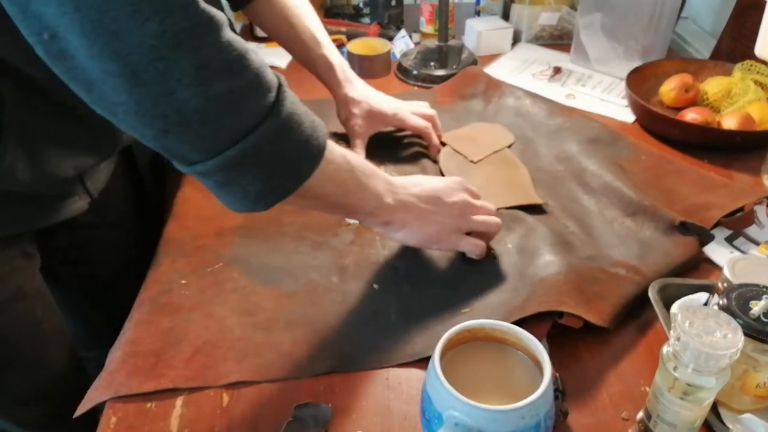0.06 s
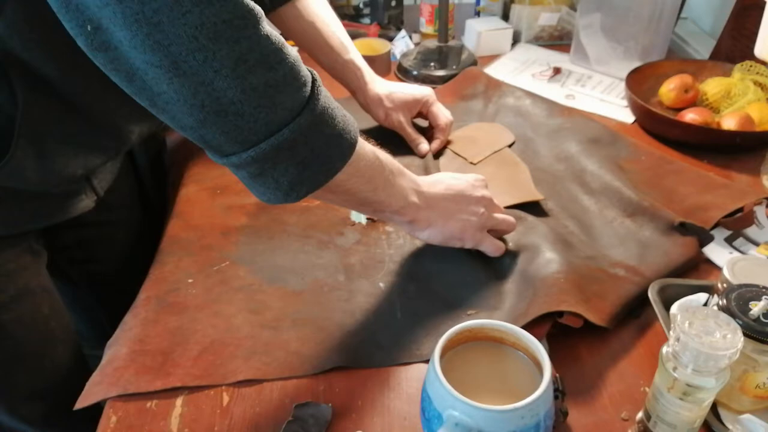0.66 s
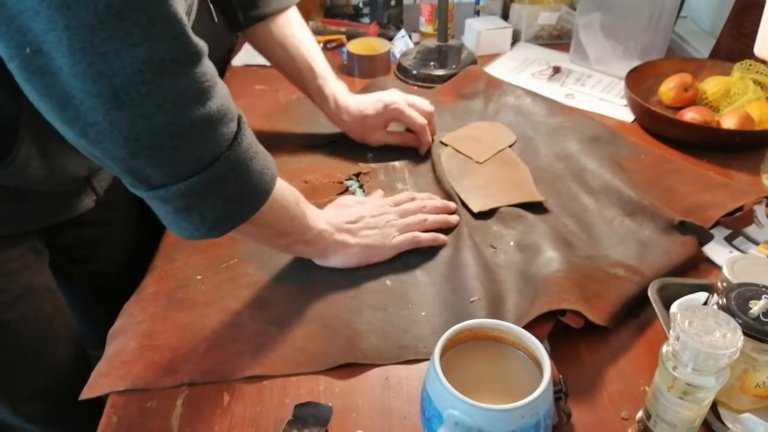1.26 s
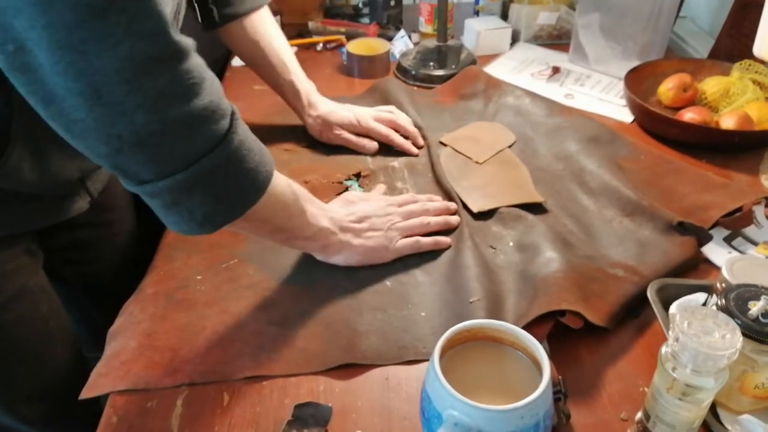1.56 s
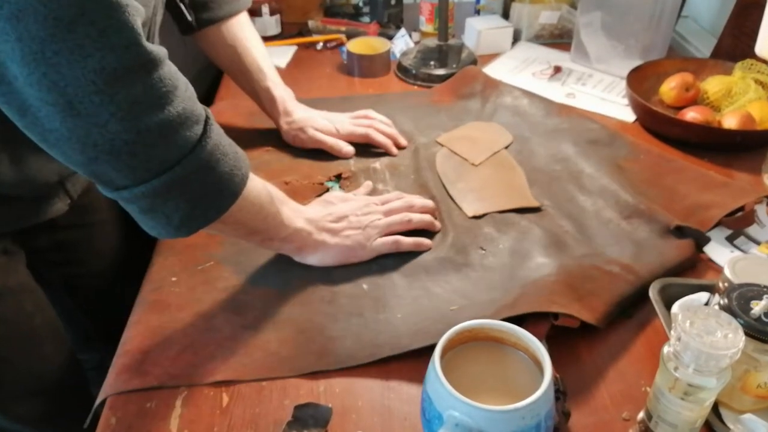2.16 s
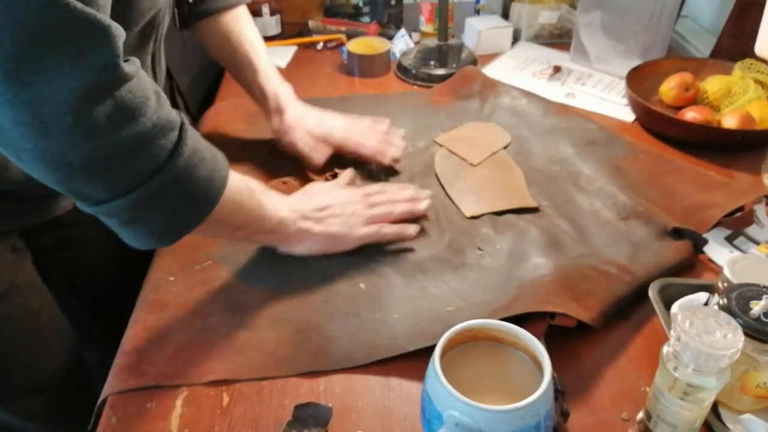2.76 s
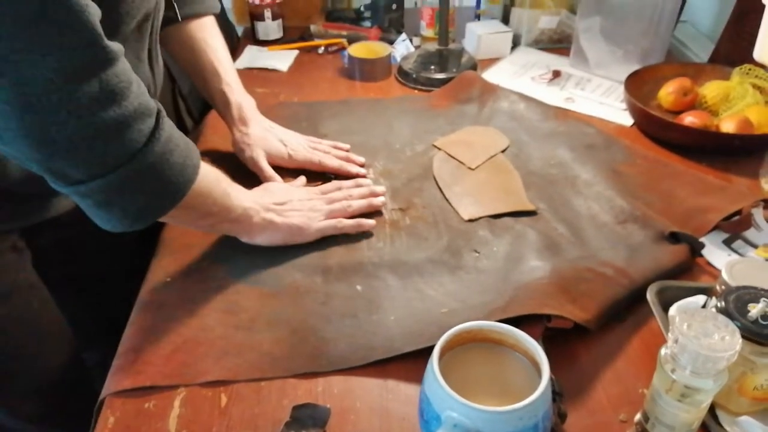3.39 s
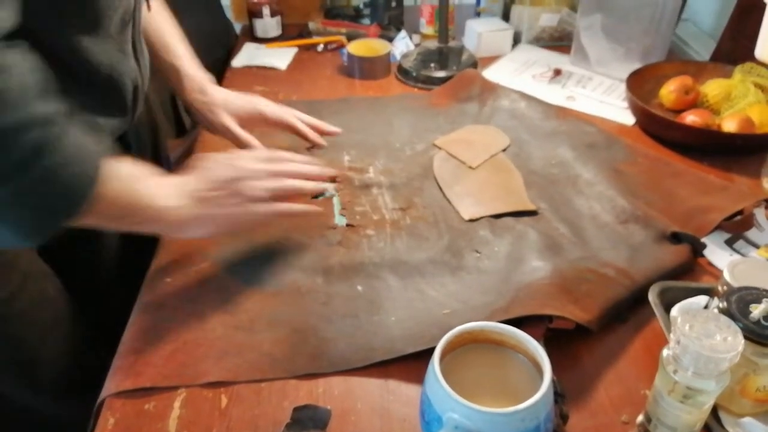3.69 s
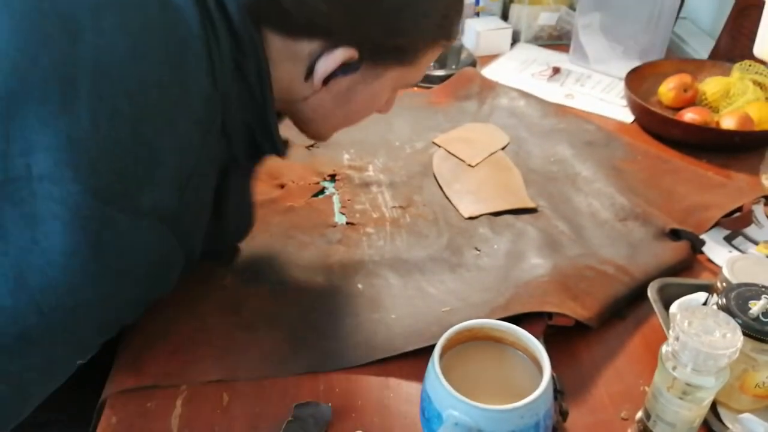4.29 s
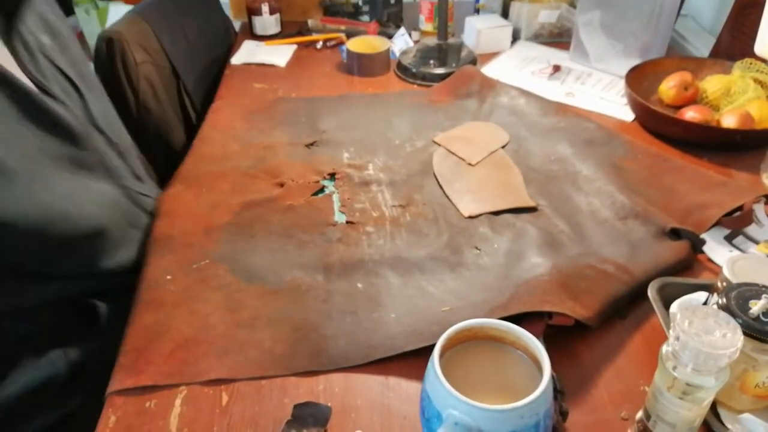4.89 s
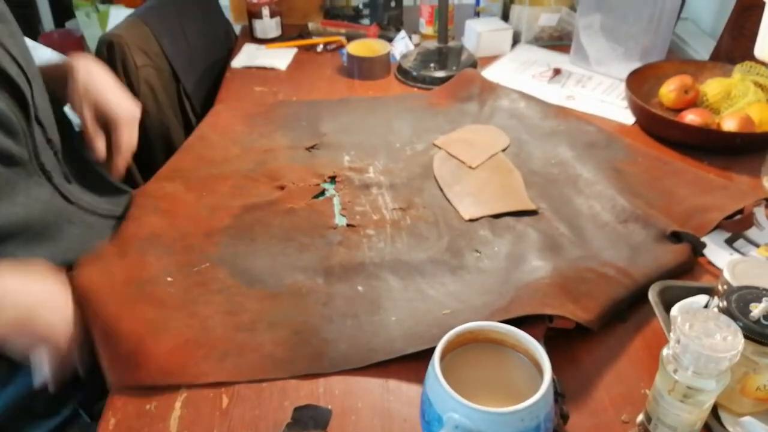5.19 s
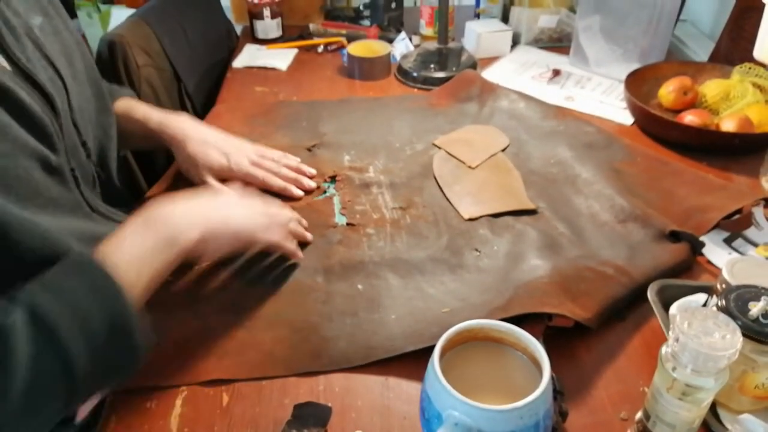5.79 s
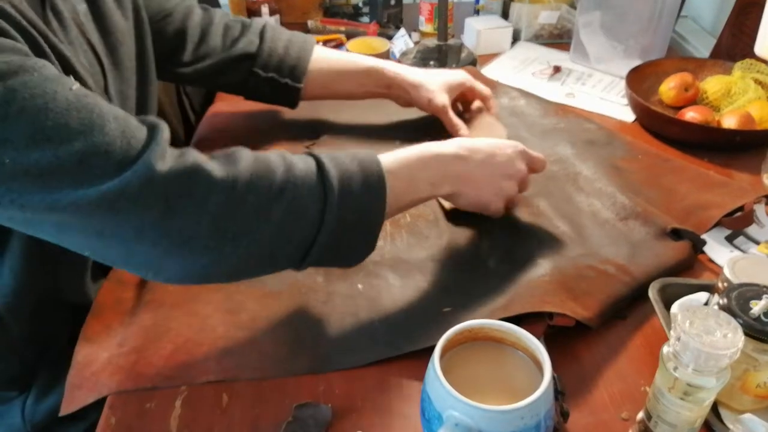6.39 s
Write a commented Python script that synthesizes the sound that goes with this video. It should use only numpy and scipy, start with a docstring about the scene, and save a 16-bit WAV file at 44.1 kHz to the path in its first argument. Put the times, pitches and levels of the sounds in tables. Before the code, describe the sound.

Hands pat and smooth a leather hide on a wooden table, with dull thumps, rustling slides and a flopping slap.

```python
"""Working leather on a table

A large hide is worked flat on a wooden table in a small, faintly humming room. Palms pat and smooth
it, a sleeve swishes, the hide is dragged along and its edge flops down with a slap. Each blow rocks
the table and sets its top booming, while the leather smacks, creaks once and pops hollowly. Sliding
is made of many tiny slips, heard as a rustle, a scrape and a grainy hiss."""
import sys
import numpy as np
from scipy import signal
from scipy.fft import rfft, irfft
from scipy.io import wavfile

SR = 44100
rng = np.random.default_rng(int(sys.argv[2]) if len(sys.argv) > 2 else 0)


def pcm_store(signal):
    """Save signal as 16-bit PCM."""
    levels = np.round(np.clip(np.atleast_2d(signal), -1, 1) * 32767)
    wavfile.write(sys.argv[1], SR, levels.astype(np.int16).T)


N = 284445
TIME = np.arange(N) / SR
BIN_HZ = np.maximum(np.arange(N // 2 + 1) * SR / N, 1)


def from_db(db):
    """Turn decibels into a gain, a number to multiply a sound by."""
    return 10 ** (np.asarray(db) / 20)


def rms_one(x):
    """Scale a sound so that its average power is 1."""
    return x / np.sqrt(np.mean(x ** 2) + 1e-20)


def at_hz(points, hz):
    """Read a table between its rows, giving each octave equal room."""
    row_hz, value = np.transpose(points)
    return np.interp(np.log(hz), np.log(row_hz), value)


def add(track, s, sound):
    """Mix a short sound into a track, starting at s seconds."""
    start = max(round(s * SR), 0)
    track[start:start + len(sound)] += sound[:N - start]


def gain_curves(rows):
    """Turn each dB column of a table into a gain over time."""
    s, *columns = np.transpose(rows)
    return [from_db(np.interp(TIME, s, column)) for column in columns]


def envelope(s, attack, hold, release):
    """A gain that rises, holds and falls."""
    return np.interp(TIME, s + np.cumsum([0, attack, hold, release]), [0, 1, 1, 0])


def swells(rows):
    """A gain made of smooth, bell-shaped bumps."""
    return sum(from_db(db) * np.exp(-.5 * ((TIME - s) / width) ** 2) for s, db, width in rows)


def unsteady(per_s, depth_db):
    """A gain that wanders at random."""
    return from_db(depth_db * np.interp(TIME * per_s, np.arange(N), rng.standard_normal(N)))


def narrow_noise(hz, width):
    """A blurred tone: noise kept close to one pitch."""
    return rms_one(irfft(rfft(rng.standard_normal(N)) / (1 + (2 * (BIN_HZ - hz) / width) ** 2), N))


def grains(per_s, spread_db):
    """Two unrelated streams of tiny slips of uneven size."""
    sizes = from_db(spread_db * np.minimum(rng.exponential(1, N), 4))
    return rng.standard_normal((2, N)) * sizes * (rng.random(N) < per_s / SR)


def press(width_ms):
    """The force of a soft touch: half a sine wave that adds up to 1."""
    pulse = np.sin(np.pi * np.clip(TIME[:SR // 3] * 1000 / width_ms, 0, 1))
    return pulse / pulse.sum()


def ring(force, modes):
    """A changing force starts an object's own tones (modes); neighbours swing opposite ways."""
    out = np.zeros(len(force))
    for k, (hz, db, fade_s) in enumerate(modes):
        decay = from_db(-60 / (fade_s * SR))
        feedback = [1, -2 * decay * np.cos(2 * np.pi * hz / SR), decay * decay]
        out += (-1) ** k * from_db(db) * signal.lfilter([.5, 0, -.5], feedback, force + 1e-18)
    return out


def resonance(x, hz, width):
    """The part of a sound that lies near one pitch."""
    return signal.lfilter(*signal.iirpeak(hz, hz / width, fs=SR), x)


# Each row: frequency in Hz, how alike the two ears are (1 the same, 0 unrelated, -1 opposite).
EAR_LIKENESS = [(60, 0.8), (140, 0.86), (270, 0.86), (520, 0.53), (1250, 0), (1650, -0.3), (2100, 0.17),
                (5000, -0.11), (15000, 0)]
# Each row: frequency in Hz, how much louder the left ear is in dB.
EAR_BALANCE = [(130, 0), (270, -3.5), (550, -4.5), (1000, -2.5), (3000, -2), (5000, -0.5), (6400, 2.5),
               (8100, -6), (10500, -2), (14500, 2)]
def colour(streams, spectrum):
    """Give two noise streams a tone colour and spread them over the ears, at power 1."""
    octaves_outside = np.abs(np.log2(BIN_HZ / np.clip(BIN_HZ, spectrum[0][0], spectrum[-1][0])))
    mid, side = rfft(streams) * from_db(at_hz(spectrum, BIN_HZ) - 30 * octaves_outside)
    alike = np.clip(at_hz(EAR_LIKENESS, BIN_HZ), -1, 1)
    ears = np.array([[1], [-1]])
    pair = np.sqrt(1 + alike) * mid + np.sqrt(1 - alike) * side * ears
    balance = from_db(ears * at_hz(EAR_BALANCE, BIN_HZ) / 2)
    return rms_one(irfft(pair * balance, N))


# The quiet room's noise. Each row: frequency in Hz, relative level in dB.
AIR_COLOUR = [(30, 0.5), (90, -8), (160, -10.5), (250, -13.5), (520, -18), (800, -18.5), (1500, -21),
              (2900, -25), (4000, -32), (5300, -24), (7300, -20), (9500, -34), (13000, -32.5),
              (15500, -30.5)]
# The room's hum. Each row: pitch in Hz, width in Hz, level in dB.
HUM_TONES = [(99, 5.9, -78.5), (145.9, 5.5, -74.5), (520, 28, -81)]
# Brief swells at the highest hum pitch. Each row: peak time in seconds, level in dB, width in seconds.
HUM_SWELLS = [(0.97, -74, 0.018), (2.14, -69.5, 0.039)]
# A deep drone. Each row: time in seconds, level in dB.
DRONE_LEVELS = [(0, -71.5), (1.8, -72.5), (1.92, -87.5), (6.45, -91.5)]
def room_air():
    """Faint hiss, a few wavering hum tones and a deep drone that dies away."""
    hum = sum(from_db(db) * narrow_noise(hz, width) * unsteady(per_s=2, depth_db=1.5)
              for hz, width, db in HUM_TONES)
    hum += swells(HUM_SWELLS) * narrow_noise(*HUM_TONES[-1][:2])
    drone = gain_curves(DRONE_LEVELS)[0] * narrow_noise(hz=41, width=7)
    hiss = from_db(-67) * colour(rng.standard_normal((2, N)), AIR_COLOUR)
    return hum + drone + hiss


# Flat palms land on the hide. Each row: start in seconds, relative levels of sway, boom and smack
# in dB, time taken to land in milliseconds.
PALM_PATS = [(0.001, -54, -35.5, -45.5, 0.56), (0.015, -65, -50, -50, 5.5), (1.286, -50, -61, -61, 7.4),
             (2.521, -54, -37.5, -51, 1.4), (2.554, -53, -34, -48, 4), (2.852, -38.5, -33.5, -40, 6.2),
             (3.135, -41, -51, -43, 2.7), (3.145, -33.5, -29.5, -38, 3.6), (3.468, -42, -29.5, -51.5, 1.6),
             (5.446, -69, -53.5, -54.5, 2.5), (5.614, -38, -31.5, -35, 3.3), (5.645, -36, -43, -28.5, 4.4)]
# Fingers and sagging leather bump. Each row: start in seconds, relative boom and smack levels in dB.
SOFT_BUMPS = [(0.038, -40, -49), (0.379, -56, -69), (1.177, -36, -57), (1.206, -47.5, -64),
              (3.874, -60.5, -68), (4.528, -43.5, -46.5), (4.992, -43, -58), (5.031, -45.5, -63),
              (5.189, -48, -56.5), (5.415, -58, -67), (6.184, -46, -53.5), (6.238, -37, -51),
              (6.329, -40.5, -57)]
# Folds flop over. Each row: start in seconds, relative boom and crack levels in dB, time taken to
# land in milliseconds.
FOLD_FLOPS = [(4.621, -54, -41.5, 7), (4.806, -26, -27, 3.6), (4.814, -27.5, -28, 8.9),
              (4.932, -38, -47.5, 5)]
def blows():
    """All blows as columns: start, five levels, landing time. Palms slap, bumps thud, folds snap."""
    # The five relative levels, in dB: sway, boom, smack, slap, snap.
    pats = [(s, sway, boom, smack, smack - 6.5, smack - 9.5, landing_ms)
            for s, sway, boom, smack, landing_ms in PALM_PATS]
    bumps = [(s, boom - 18, boom, smack, smack - 14.5, smack - 16.5, 4)
             for s, boom, smack in SOFT_BUMPS]
    flops = [(s, crack - 11.5, boom, crack - 4.5, crack - 5, crack + 3.5, landing_ms)
             for s, boom, crack, landing_ms in FOLD_FLOPS]
    return np.transpose(pats + bumps + flops)


def pushes(starts, levels_db, width_ms):
    """Hand and leather press on the table once at each blow."""
    force = np.zeros(N)
    for s, db in zip(starts, levels_db):
        add(force, s, from_db(db) * press(width_ms))
    return force


# The tones of the table swaying on its legs, then of its top.
# Each row: pitch in Hz, relative level in dB, seconds to fade by 60 dB.
SWAY_MODES = [(41.4, -0.5, 0.35), (61, 1.5, 0.35)]
TOP_MODES = [(89.4, -10.5, 0.32), (124.7, 0.5, .21), (138, -7.5, 0.11), (161.6, -6.5, 0.32),
             (248.3, -18.5, 0.29), (284, -18.5, 0.4), (382.6, -12.5, 0.28)]
def table_boom():
    """Blows rock the table on its legs and make the top boom."""
    starts, sway_db, boom_db, *_ = blows()
    sway = ring(pushes(starts, sway_db, width_ms=14.4), SWAY_MODES)
    boom = ring(pushes(starts, boom_db, width_ms=2.63), TOP_MODES)
    return from_db(3) * sway + from_db(2.5) * boom


def landings(levels_db, linger_s):
    """A gain that grows as more leather touches, then dies away with the squeezed air and creases."""
    starts, *_, landing_ms = blows()
    power, age = np.zeros(N), TIME[:SR // 4]
    for s, db, rise_s in zip(starts, levels_db, landing_ms / 1000):
        rise = np.minimum(age / rise_s, 1) ** 0.68
        fall = np.exp(-np.maximum(age - rise_s, 0) / linger_s)
        add(power, s, (from_db(db) * rise * fall) ** 2)
    return np.sqrt(power)


# The low, middle and high noise of a blow. Each row: frequency in Hz, relative level in dB.
SMACK_COLOUR = [(110, 8), (200, -1.5), (290, 1.5), (385, -1.5), (460, -2.5), (580, -4.5), (720, -4.5),
                (950, -7), (1500, -12.5)]
SLAP_COLOUR = [(600, -31), (1000, 0), (1400, 1), (2100, -2), (3100, -9.5), (3800, -15.5), (5000, -47)]
SNAP_COLOUR = [(3000, -11.5), (4200, -7), (5100, 0.5), (7200, 0.5), (9000, -16), (12000, -22.5),
               (15500, -20)]
def leather_smacks():
    """At each blow trapped air smacks, the surface slaps and the creases snap."""
    *_, smack_db, slap_db, snap_db, _ = blows()
    smack = landings(smack_db, linger_s=0.028) * colour(grains(12000, 1.5), SMACK_COLOUR)
    slap = landings(slap_db - .4, linger_s=0.018) * colour(grains(12000, 1.8), SLAP_COLOUR)
    snap = landings(snap_db - .6, linger_s=0.017) * colour(grains(16000, 1.4), SNAP_COLOUR)
    return smack + slap + snap


# Short ringing tones at the blows: one brief high creak, then hollow pops under a palm or fold.
# Each row: start in seconds, pitch in Hz, relative level in dB, seconds to fade by 60 dB.
SHORT_TONES = [(0.015, 1780, -38.5, 0.03), (0.043, 242, -39, .13), (1.18, 227, -40.5, 0.17),
               (2.857, 1050, -45, .04), (3.148, 536, -41, 0.076), (3.468, 156.3, -30.5, 0.17),
               (4.622, 739, -32, .1), (4.812, 286.7, -28, 0.18), (4.818, 815, -28.5, 0.076),
               (5.647, 383.3, -21.5, .13), (5.648, 510, -25, 0.041), (5.648, 688, -27.5, 0.086),
               (5.647, 867, -26, 0.067)]
def creak_and_pops():
    """Each tone gets a push half a cycle long and rings briefly and unevenly, off centre."""
    tones = np.zeros(N)
    for s, hz, db, fade_s in SHORT_TONES:
        add(tones, s, ring(press(width_ms=500 / hz), [(hz, db, fade_s)]))
    return tones * unsteady(per_s=200, depth_db=5.5) * from_db([[-1.8], [1.2]])


# Strokes of hand, sleeve or hide. Each row: start, rise, hold and fall in seconds, relative scrape
# level in dB, then the dB added to that for the rustle and for the hiss.
STROKES = [(0.25, .31, 0.018, 0.17, -71.5, -2.5, 8), (1.239, 0.2, 0.033, 0.089, -73.5, -5, 14),
           (1.859, 0.021, 0.14, 0.033, -57, 0.5, -15), (1.9, 0.043, .03, .05, -57.5, -4, -7.5),
           (2.17, 0.077, .01, 0.066, -67.5, 0.5, -3), (2.56, 0.11, 0.011, 0.038, -63, -25, 5),
           (3.963, 0.065, .02, 0.062, -62, -17, 9), (4.03, .08, 0.26, .1, -84.5, 2, 14.5),
           (4.307, 0.036, 0.014, 0.052, -57.5, 7, -4.5), (4.79, .01, .12, 0.066, -54.5, 8.5, 0),
           (4.95, 0.041, .02, .3, -67, 6.5, 1), (5.441, 0.011, 0.015, 0.097, -56.5, 3.5, -1.5),
           (5.51, 0.032, 0.012, 0.12, -52.5, 1, -1), (6.27, 0.05, 0.019, 0.053, -48, 2, 0),
           (6.35, 0.019, .005, 0.088, -56.5, -10, 0.5)]
def stroke_power():
    """How strongly the short strokes rustle, scrape and hiss over time."""
    power = np.zeros((3, N))
    for s, attack, hold, release, db, rustle_db, hiss_db in STROKES:
        gains = from_db([db + rustle_db, db, db + hiss_db])
        power += np.outer(gains, envelope(s, attack, hold, release)) ** 2
    return power


# The low, middle and high noise of sliding. Each row: frequency in Hz, relative level in dB.
RUSTLE_COLOUR = [(130, -22.5), (260, -1), (400, -1.5), (700, 2), (950, 0), (1500, -12.5)]
SCRAPE_COLOUR = [(600, -25), (1000, -0.5), (1400, -1.5), (2100, -2), (3100, -10), (3800, -12), (5200, -10)]
HISS_COLOUR = [(2800, -19), (4200, -10.5), (5200, -3), (7300, 1.5), (9000, -11), (12000, -17.5),
               (15000, -14), (16000, -24)]
def sliding():
    """The hide's rough side rustles and scrapes; its fine side hisses under skin and cloth."""
    rustle_gain, scrape_gain, hiss_gain = np.sqrt(stroke_power() + drag_power())
    fine_grain = grains(per_s=24000, spread_db=1.3)
    rumble = flex_rumble()
    rustle = from_db(-1) * rustle_gain * colour(grains(2000, 4.1), RUSTLE_COLOUR)
    scrape = from_db(1.46) * scrape_gain * colour(grains(4000, 1.6), SCRAPE_COLOUR)
    hiss = from_db(3) * hiss_gain * colour(fine_grain, HISS_COLOUR)
    pressure = unsteady(per_s=110, depth_db=0.5)
    return pressure * (rumble + rustle + scrape + hiss)


# Faint, thin squeaks.
# Each row: peak time in seconds, pitch in Hz, width in Hz, level in dB, width in seconds.
SQUEAKS = [(2.16, 2030, 110, -78, 0.049), (2.332, 2250, 260, -76.5, .017)]
def squeaks():
    """Skin catches on the finished surface and sings briefly."""
    return sum(swells([(s, db, width_s)]) * narrow_noise(hz, width_hz)
               for s, hz, width_hz, db, width_s in SQUEAKS)


# Scuffs as the hide settles. Each row: peak time in seconds, level in dB, width in seconds.
SCUFFS = [(2.845, -58, 0.003), (3.131, -63, 0.0018), (4.454, -60, .012), (5.057, -57.5, 0.02),
          (5.14, -60, 0.021), (5.268, -60.5, 0.02), (6.241, -55.5, 0.0037), (6.284, -49, 0.0053)]
def scuffs():
    """Leather brushes on cloth with a short crackle."""
    return swells(SCUFFS) * colour(grains(2500, 4.2), HISS_COLOUR)


# The long pull across the table. Each row: time in seconds, relative scrape and hiss levels in dB.
DRAG_LEVELS = [(4.39, -62.5, -63), (4.41, -64.5, -62), (4.466, -57.5, -48.5), (4.6, -51, -50.5),
               (4.64, -42.5, -42.5), (4.736, -50, -47), (4.795, -50.5, -46)]
def drag_power(ease_s=0.012):
    """How strongly the dragged hide rustles, scrapes and hisses; the rustle follows the scrape."""
    start, end = DRAG_LEVELS[0][0], DRAG_LEVELS[-1][0]
    scrape, hiss = envelope(start - ease_s, ease_s, end - start, ease_s) * gain_curves(DRAG_LEVELS)
    return np.square([from_db(4) * scrape, from_db(-4) * scrape, from_db(-0.5) * hiss])


# Moments when the hide bends. Each row: peak time in seconds, level in dB, width in seconds.
FLEXES = [(4.545, -44.5, 0.046), (4.68, -47.5, 0.059), (6.335, -42.5, 0.022)]
# The noise of that bending. Each row: frequency in Hz, relative level in dB.
RUMBLE_COLOUR = [(30, -24), (70, -11.5), (125, -0.5), (170, 0), (260, -8), (420, -31)]
def flex_rumble():
    """The big sheet bends and rumbles as it is pulled."""
    return swells(FLEXES) * colour(grains(700, 1.7), RUMBLE_COLOUR)


# Where the work is. Each row: time in seconds, place from 0 (table top) to 1 (hanging edge).
WORK_PLACE = [(0, 0.12), (3.7, 0.16), (4.0, 1), (4.5, 0.72), (5.3, 0.92), (5.6, 0.55), (6.45, 0.67)]
def placed(leather):
    """On the table top the leather sounds near and centred; the free edge rasps more and sounds wider."""
    edge = np.clip(np.interp(TIME, *np.transpose(WORK_PLACE)), 0, 1)
    leather = leather + edge * from_db(1) * resonance(leather, hz=3110, width=830)
    middle = leather.mean(axis=0)
    return middle + (leather - middle) * from_db(-3.5 + 5 * edge)


# How long the room rings. Each row: frequency in Hz, seconds to fade by 60 dB.
ROOM_FADES = [(100, 0.62), (400, 0.38), (1500, 0.34), (5000, 0.33), (9000, 0.41), (15000, 0.083)]
def room_echoes(sound, first_echo_s=0.0035, build_up_s=0.0024):
    """Many reflections blur into one tail, whose highs die sooner than its lows."""
    age, tail = TIME[:SR], 0
    onset = np.clip((age - first_echo_s) / build_up_s, 0, 1)
    edges = np.geomspace(40, 16000, 10)
    for low, high in zip(edges, edges[1:]):
        hz = np.sqrt(low * high)
        band_filter = signal.butter(2, [low, high], "band", fs=SR, output="sos")
        mid, side = signal.sosfilt(band_filter, rng.standard_normal((2, SR)))
        alike = np.clip(at_hz(EAR_LIKENESS, hz), 0, 1)
        band = np.sqrt(1 + alike) * mid + np.sqrt(1 - alike) * side * [[1], [-1]]
        band *= onset * from_db(-60 * age / at_hz(ROOM_FADES, hz))
        energy_share = 2 * (high - low) / SR
        tail = tail + band * np.sqrt(energy_share / np.sum(band ** 2, axis=1, keepdims=True))
    return signal.fftconvolve(sound * np.ones((2, 1)), tail, axes=1)[:, :N]


def scene():
    """Table, short tones, smacks and rubbing, each with its share of echo, over the quiet room."""
    boom, tones = table_boom(), creak_and_pops()
    smacks = placed(leather_smacks())
    rubbing = placed(sliding() + scuffs() + squeaks())
    to_room = from_db(-11.5) * boom + from_db(-10) * tones
    to_room = to_room + from_db(-3.5) * smacks + from_db(-6.5) * rubbing
    return from_db(-1) * boom + tones + smacks + rubbing + room_echoes(to_room) + room_air()


# Resonances of the microphone's opening. Each row: frequency in Hz, width in Hz, boost or cut in dB.
MIC_RESONANCES = [(2867, 460, 4.5), (3330, 260, 2), (5120, 440, 1.5), (6000, 520, -2.5), (10070, 380, 2.5)]
def record(dry, bass_cut_hz=24, treble_cut_hz=15600):
    """The microphone loses the deepest bass and colours the treble; the very top is cut steeply."""
    sound = signal.sosfilt(signal.butter(2, bass_cut_hz, "high", fs=SR, output="sos"), dry)
    for hz, width, db in MIC_RESONANCES:
        sound = sound + (from_db(db) - 1) * resonance(sound, hz, width)
    return signal.sosfilt(signal.ellip(10, .2, 80, treble_cut_hz, fs=SR, output="sos"), sound)


dry = scene()
out = record(dry)
pcm_store(out)
```